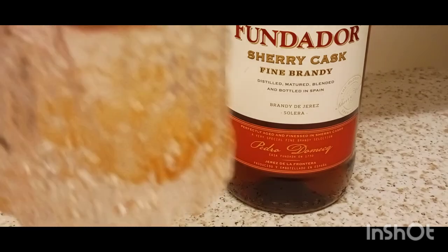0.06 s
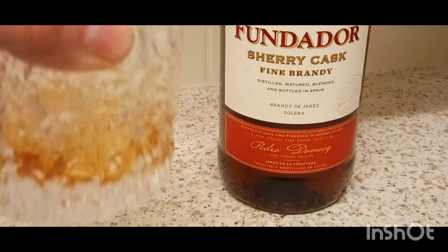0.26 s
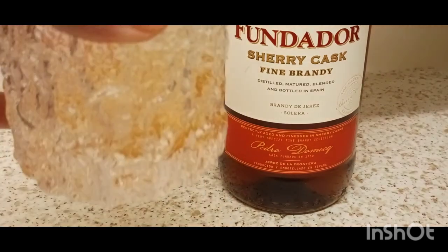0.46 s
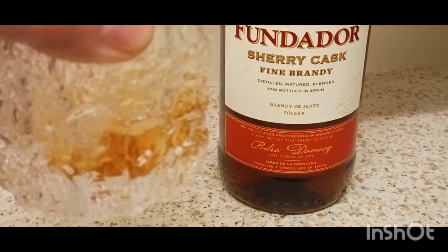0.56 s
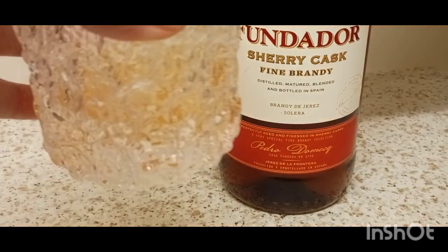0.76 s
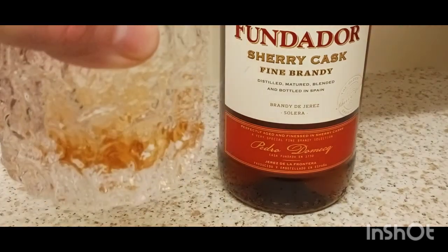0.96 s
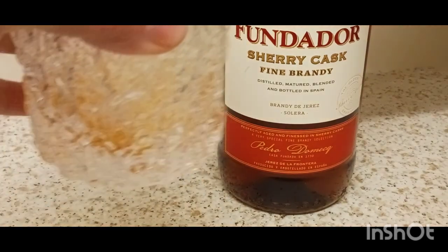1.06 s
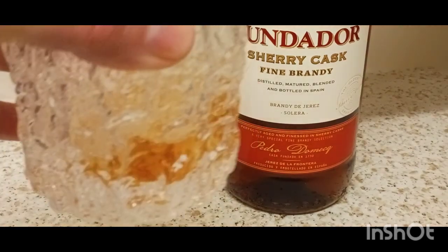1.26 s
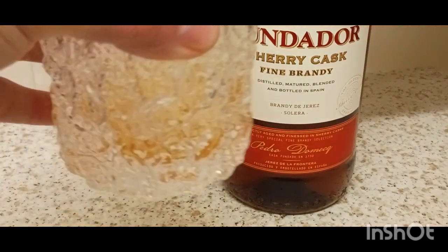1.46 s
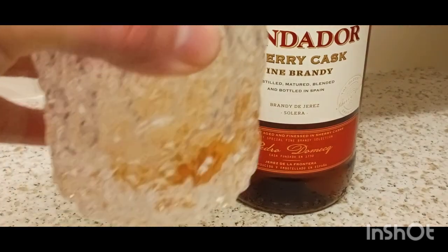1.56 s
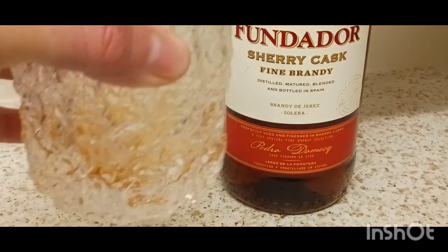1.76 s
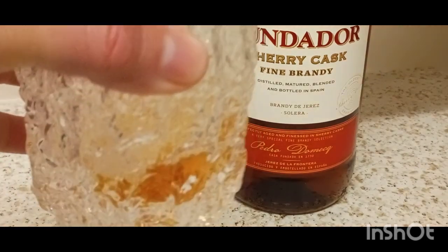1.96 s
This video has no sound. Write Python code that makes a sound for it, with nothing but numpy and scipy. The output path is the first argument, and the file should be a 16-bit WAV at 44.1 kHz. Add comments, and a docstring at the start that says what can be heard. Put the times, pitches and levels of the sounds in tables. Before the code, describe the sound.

Ice cubes clink in a hand-swirled glass tumbler. Nearly quiet until 0.2 s, then crisp knocks crowd together from 0.25 to 0.55 s, with a clear liquid glug near 0.52. Looser rattling runs to 0.9, a brief lull, lighter clinks from 1.0, a strong pair near 1.4, another at 1.7, then faint ticks. Short damped rings, soft slosh, low handling rumble, small hard room, close stereo.

```python
"""Ice cubes knock against the wall of a thick tumbler swirled by hand in a small hard room.
Each knock is a brief noise crunch that rings the damped modes of the glass and the cube's own short clack.
Small random touches rattle between, the drink glugs in swelling sines, a few dull thuds sound low down.
Slosh, room tone and handling rumble are lumpy filtered noise. Two microphone ports, the left a little
nearer, hear the glass direct, in near echoes and in a diffuse tail."""
import sys
import numpy as np
from scipy import signal
from scipy.fft import rfft, irfft, next_fast_len
from scipy.io import wavfile
from scipy.ndimage import uniform_filter1d

SR = 44100
rng = np.random.default_rng(int(sys.argv[2]) if len(sys.argv) > 2 else 0)


def generate_wav(signal):
    """Clip the signal to [-1, 1] and save it as 16-bit WAV at the path in sys.argv[1]."""
    frames = np.transpose(np.atleast_2d(signal))
    scaled = np.clip(frames, -1, 1) * 32767
    pcm = np.round(scaled).astype(np.int16)
    wavfile.write(sys.argv[1], SR, pcm)


def gain_from_decibels(decibels):
    """Convert decibel values to linear amplitude factors."""
    exponent = np.asarray(decibels, float) / 20
    return 10 ** exponent


N = 88200

CLACK_T60_S, LONGEST_RING_S = .009, .11  # the cube's clack; the hand damps the wall
CRACK_DB, CRACK_LOW_HZ = -0.5, 6000


def rms_one(x):
    """Scales a sound to an rms of one."""
    return x / np.sqrt(np.mean(x ** 2) + 1e-20)


def at_hz(points, hz):
    """Reads a (f/Hz, value) table along log frequency."""
    table_hz, values = np.array(points).T
    return np.interp(np.log(hz + 1), np.log(table_hz), values)


def in_time(rows):
    """Draws a (t/s, value) table as a curve over the scene."""
    return np.interp(np.arange(N) / SR, *np.transpose(rows))


def ring(x, hz, t60):
    """A damped resonator: a unit click sets a sine of height about 1 ringing, for 2 ms at least."""
    radius = gain_from_decibels(-60 / (max(t60, .002) * SR))
    turn = 2 * np.pi * hz / SR
    return signal.lfilter([0, np.sin(turn)], [1, -2 * radius * np.cos(turn), radius ** 2], x + 1e-18)


def struck(crunch, hz, t60):
    """A mode rung by a crunch, whose chance strength at that pitch is partly evened out."""
    t = np.arange(len(crunch)) / SR
    share = np.abs(np.sum(crunch * np.exp(2j * np.pi * hz * t)))
    return ring(crunch, hz, t60) / np.sqrt(share ** 2 + .1)


def detuned(hz, t60, chance):
    """Where a contact lands shifts a mode a little; modes ringing over 30 ms keep their pitch better."""
    return hz * (1 + .022 * chance * min(1, .03 / t60))


def crack(x):
    """The bright edge of a contact."""
    high_pass = signal.butter(2, CRACK_LOW_HZ, "high", fs=SR, output="sos")
    return gain_from_decibels(CRACK_DB) * signal.sosfilt(high_pass, x)


# modes of the hand-held glass, also rung by the rattle: (f/Hz, relative level/dB, t60/s before the cap)
GLASS_MODES = [(1178, 2, 0.018), (1633, -14, 0.098), (1830, -4, 0.0073), (2560, -1, 0.14),
               (2738, 3.5, 0.072), (3280, 5, 0.0087), (3700, 8.5, 0.0071), (4310, 7.5, 0.01),
               (5290, -0.5, 0.0034), (5855, -1.5, 0.011), (6375, 5, 0.017), (6805, 7.5, 0.023),
               (9000, -23, 0.013), (11050, -2, 0.0018)]
# knocks of ice on glass: (t/s, relative level/dB, f/Hz of the cube's clack, brightness/dB per octave, unclipped)
ICE_KNOCKS = [(.0074, -25, 2980, -10), (.2062, -26.5, 6440, 5), (0.2248, -13.5, 6600, 0.5),
              (0.2518, -11, 6060, 1.5), (.2554, -15.5, 6000, 13), (0.2862, -12, 3280, 0.5),
              (0.3658, -28, 2420, -6.5), (0.3881, -17.5, 3040, 12), (0.394, -8, 6430, 4.5),
              (0.4043, -12, 6100, 13), (0.4265, -14, 4040, 4), (0.442, -16.5, 5050, 13),
              (.456, -12.5, 5220, 21), (0.4671, -11, 6020, -9), (0.5034, -13, 6370, -4),
              (.5307, -11.5, 6660, -3), (0.5347, -15, 7000, 4), (0.5932, -21.5, 3430, 2),
              (0.623, -24.5, 3000, 13), (0.6313, -22, 1600, -1), (0.6535, -19.5, 2880, -3),
              (.693, -19.5, 4250, -4), (0.7035, -14, 4200, -4.5), (0.7386, -17, 2600, -6),
              (0.7699, -18.5, 3720, 1), (0.7875, -23, 4300, -1), (0.7996, -10, 6300, 2.5),
              (0.8373, -20, 6570, 3), (.8618, -13, 2806, 6), (0.8764, -25.5, 2560, -4),
              (.895, -22.5, 5980, 4), (0.9895, -32.5, 2660, -5), (1.0023, -23.5, 3150, -7),
              (1.008, -20.5, 2870, -5), (1.0201, -15.5, 6110, 1.5), (1.0539, -23.5, 3990, 0),
              (1.0845, -27, 3630, -2), (1.095, -27.5, 3960, 0.5), (1.1121, -27, 4300, 1),
              (1.1512, -14, 6260, 0.5), (1.1731, -27.5, 1550, -2), (1.2012, -18.5, 9770, 1.5),
              (1.2373, -21.5, 5850, -3), (1.252, -18, 6000, 3.5), (1.3371, -26, 6380, -2.5),
              (1.3723, -18.5, 3140, -8.5), (1.389, -15, 6690, -2), (1.3972, -8, 6120, 3),
              (1.42, -11.5, 7000, 7.5), (1.4604, -27.5, 2700, -4), (1.5094, -25, 1550, 7),
              (1.5362, -23, 6280, 6), (1.5442, -22, 6500, 1.5), (1.6133, -25, 3750, -12),
              (1.677, -29.5, 4380, -14), (1.6935, -11, 6460, 7), (1.7071, -19.5, 6350, -1.5),
              (1.7454, -22, 6820, 14), (1.7589, -19.5, 3780, -7), (1.7814, -27.5, 4530, 3),
              (1.8161, -20, 3524, -3), (1.8694, -24, 4370, -3), (1.8814, -25.5, 4300, -4),
              (1.9758, -29, 4260, 15), (1.9914, -25.5, 2640, 6)]


def knocks():
    """A short crunch strikes every glass mode with a strength of its own, and the cube clacks."""
    crunch_s, crunch_rise_s = .001, .0004
    grind_s, grind_db = .01, -21  # a fainter, longer scrape
    dullest, brightest = -3, 13  # dB per octave
    clack_db, mode_chance_db, knock_db = 18.5, 3, -7
    out, t = np.zeros(N), np.arange(SR // 8) / SR
    decay = np.exp(-t / crunch_s) + gain_from_decibels(grind_db) * np.exp(-t / grind_s)
    shape = decay * (1 - np.exp(-t / crunch_rise_s))
    for s, db, clack_hz, tilt in ICE_KNOCKS:
        tilt = np.clip(tilt, dullest, brightest)
        crunch = rng.standard_normal(len(t)) * shape
        crunch = crunch / np.sqrt(np.sum(crunch ** 2))
        hit = gain_from_decibels(clack_db) * struck(crunch, clack_hz, CLACK_T60_S)
        hit += gain_from_decibels(tilt) * crack(crunch)
        for hz, mode_db, t60 in GLASS_MODES:
            strength, tune = rng.standard_normal(2)
            gain_db = mode_db + mode_chance_db * strength + tilt * np.log2(hz / 6000)
            hit += gain_from_decibels(gain_db) * struck(crunch, detuned(hz, t60, tune), min(t60, LONGEST_RING_S))
        first_5_ms = hit[:SR // 200]
        hit = gain_from_decibels(db + knock_db) * hit / np.sqrt(np.mean(first_5_ms ** 2) * 2)
        start = int(s * SR)
        out[start:start + len(hit)] += hit[:N - start]
    return out


# vigour of the small touches between knocks: (t/s, relative level/dB)
TOUCH_VIGOUR = [(0, -42), (.08, -68), (.11, -106), (.2, -55), (.24, -40), (.35, -45.5), (.45, -32),
                (.6, -45.5), (.88, -35.5), (.94, -74), (1.05, -43.5), (1.26, -49.5), (1.32, -56.5),
                (1.42, -37.5), (1.57, -56), (1.72, -47), (1.9, -48.5), (1.95, -69)]


def rattle():
    """Random small touches ring the same glass, detuned by where they land, and clack at scattered pitches."""
    touches_per_s, spread_db, clack_db, rattle_db = 700, 3.5, 16, 3.5
    strength = gain_from_decibels(spread_db * np.minimum(rng.exponential(1, N), 2.5))
    touch = (rng.random(N) < touches_per_s / SR) * strength
    rings = crack(touch)
    dealt = rng.integers(0, 16, size=N)  # which of 16 clack pitches each touch gets
    for k, hz in enumerate(np.geomspace(1300, 7000, num=16)):
        rings += gain_from_decibels(clack_db) * ring(touch * (dealt == k), hz, CLACK_T60_S)
    for group in range(4):  # four landing spots, each with its own detuning
        spot = touch * (dealt // 4 == group)
        for hz, db, t60 in GLASS_MODES:
            taps = spot * rng.standard_normal(N)
            mode_hz = detuned(hz, t60, rng.standard_normal())
            rings += gain_from_decibels(db) * ring(taps, mode_hz, min(t60, LONGEST_RING_S))
    return gain_from_decibels(in_time(TOUCH_VIGOUR) + rattle_db) * rms_one(rings)


# glugs of the drink: (t/s of the swell's top, level/dB there before the ports, f/Hz there, swell width/s)
DRINK_GLUGS = [(0.31, -30.5, 1013, 0.0057), (0.443, -20, 1140, 0.0014), (0.455, -24.5, 772, 0.0021),
               (0.459, -28.5, 1008, 0.01), (0.468, -25.5, 1300, 0.0017), (0.5, -28.5, 810, 0.0031),
               (0.519, -8.5, 1085, 0.0026), (0.533, -16.5, 1760, 0.00054), (0.697, -31, 700, 0.0023),
               (0.744, -16, 1118, 0.0018), (1.149, -29.5, 1050, 0.0015)]


def drink():
    """Each glug is an air pocket: a sine that swells, fades and rises in pitch."""
    rise_per_s = 5  # share of the pitch gained each second
    out = np.zeros(N)
    for s, db, hz, swell in DRINK_GLUGS:
        t = np.arange(N) / SR - s
        envelope = np.exp(-.5 * (t / swell) ** 2)
        cycles = hz * t * (1 + .5 * rise_per_s * t)
        out += gain_from_decibels(db) * envelope * np.sin(2 * np.pi * cycles)
    return out


# colour of the left port against the right, before the overall offset: (f/Hz, level/dB)
PORT_COLOUR = [(300, -8), (1000, 11.5), (3000, 13), (7000, 0.5), (13000, 9.5)]


def ports(x):
    """The glass is nearer the left port: the right hears it later and in another colour."""
    left_lead_s, left_db = 0.0002023, -5.5
    size = next_fast_len(N + 512)
    hz = np.fft.rfftfreq(size, 1 / SR)
    half = gain_from_decibels(.5 * (left_db + at_hz(PORT_COLOUR, hz)))  # half the difference goes to each port
    right = np.exp(-2j * np.pi * hz * left_lead_s) / half
    return irfft(rfft(x, size) * np.array([half, right]), size)[:, :N]


def near_echoes(x):
    """Counter, bottle and hand scatter the sound for a few ms, apart at the ports, anew as the glass moves."""
    echo_db, echo_s, swirl_step_s = 0, .0012, .03
    t, step = np.arange(SR // 100) / SR, int(swirl_step_s * SR)
    out = np.zeros((2, N + SR))
    x = np.r_[np.zeros(step), x, np.zeros(2 * step)]
    fade = np.hanning(2 * step)  # overlapping positions crossfade
    for i in range(0, N + step, step):
        echoes = rng.standard_normal((2, len(t))) * np.exp(-t / echo_s)
        echoes = echoes / np.sqrt(np.sum(echoes ** 2, axis=1, keepdims=True))
        part = signal.fftconvolve(x[None, i:i + 2 * step] * fade, echoes, axes=1)
        out[:, i:i + part.shape[1]] += part
    return gain_from_decibels(echo_db) * out[:, step:step + N]


# decay of the small hard room: (f/Hz, t60/s)
ROOM_DECAY = [(300, 0.59), (1200, 0.26), (3500, 0.26), (8000, 0.25), (15000, 0.15)]


def room(x):
    """Diffuse noise tail, unrelated at the two ports, dying band by band."""
    room_db, gap_s = -1.5, 0.0018
    t, tail = np.arange(SR // 2) / SR, 0
    edges = np.geomspace(150, 18000, 11)
    white = rng.standard_normal((2, len(t)))
    for low, high in zip(edges, edges[1:]):
        band = signal.sosfilt(signal.butter(2, [low, high], "band", fs=SR, output="sos"), white)
        t60 = np.clip(at_hz(ROOM_DECAY, np.sqrt(low * high)), .05, 1)
        tail = tail + band * gain_from_decibels(-60 * t / t60)
    tail = tail * np.clip(t / gap_s - 1, 0, 1)  # silent for one gap, faded in over the next
    tail = tail / np.sqrt(np.sum(tail ** 2) / 2)
    return gain_from_decibels(room_db) * signal.fftconvolve(x[None], tail, axes=1)[:, :N]


# dull thuds: (t/s of the swell's top, level/dB there, f/Hz, rise width/s, fall width/s)
DULL_THUDS = [(0.252, -55.5, 148, 0.002, 0.0035), (0.411, -52.5, 311, 0.0068, 0.021),
              (0.451, -44, 333, 0.009, 0.0089), (0.912, -55, 144, 0.019, 0.025),
              (1.568, -46, 121, 0.0025, 0.0086), (1.832, -40.5, 278, 0.0013, 0.0062),
              (1.86, -35.5, 327, 0.0014, 0.0025)]


def thuds():
    """Soft low sine bumps that swell and fade, alike at both ports."""
    out = np.zeros(N)
    for s, db, hz, rise, fall in DULL_THUDS:
        t = np.arange(N) / SR - s
        envelope = np.exp(-.5 * (t / np.where(t < 0, rise, fall)) ** 2)
        out += gain_from_decibels(db) * envelope * np.sin(2 * np.pi * hz * t)
    return out


def lumpy_noise(spectrum, level, side_db):
    """Coloured noise whose level comes in lumps, part common and part opposed at the two ports."""
    lump_db, lumps_per_s = 3, 14
    hz = np.fft.rfftfreq(N, 1 / SR)
    colour = gain_from_decibels(at_hz(spectrum, hz)) * (hz > 10)
    mid, side = irfft(rfft(rng.standard_normal((2, N))) * colour, N)
    slow = (hz > 1) / (1 + (hz / lumps_per_s) ** 2)
    lumps = rms_one(irfft(rfft(rng.standard_normal(N)) * slow, N))
    noise = rms_one(mid + gain_from_decibels(side_db) * side * [[1], [-1]])
    return gain_from_decibels(in_time(level) + lump_db * lumps) * noise


# colour of the low slosh and room tone: (f/Hz, relative level/dB per Hz)
SLOSH_COLOUR = [(100, -24.5), (200, -15), (330, 1), (520, -6), (1000, -29), (4000, -19.5), (16000, -25)]
# its course before the lumps: (t/s, level/dB)
SLOSH_LEVEL = [(0, -68.5), (.2, -68), (.42, -56.5), (.85, -60.5), (.95, -77), (1.1, -62.5), (1.33, -71.5),
               (1.5, -65.5), (1.7, -58.5), (2, -58.5)]


def slosh_and_room_tone():
    """Low noise, mostly common to both ports."""
    return lumpy_noise(SLOSH_COLOUR, SLOSH_LEVEL, side_db=-9)


# colour of the handling rumble: (f/Hz, relative level/dB per Hz)
RUMBLE_COLOUR = [(25, -9), (60, -9.5), (150, -5.5), (250, -6), (500, -49)]
# its course before the lumps: (t/s, level/dB)
RUMBLE_COURSE = [(0, -71), (.15, -94), (.25, -79.5), (.9, -73), (2, -73)]


def handling_rumble():
    """Deep noise with nearly as much opposed as common sound at the two ports."""
    return lumpy_noise(RUMBLE_COLOUR, RUMBLE_COURSE, side_db=-0.5)


def scene():
    """Ice and glugs, direct and reflected, over thuds and low noise."""
    glass_low_hz, glug_wet_db = 933, -3
    no_bass = signal.butter(6, glass_low_hz, "high", fs=SR, output="sos")  # the small glass radiates no bass
    ice = signal.sosfilt(no_bass, knocks() + rattle())
    glugs = drink()
    direct = ports(ice + glugs)
    reflected = near_echoes(ice) + room(ice + gain_from_decibels(glug_wet_db) * glugs)
    return direct + reflected + thuds() + slosh_and_room_tone() + handling_rumble()


def roll_off(x):
    """The treble ends steeply here."""
    return signal.sosfilt(signal.butter(12, 16810, fs=SR, output="sos"), x)


def record(dry):
    """The recorder ends the treble and turns quiet sound above its low edge further down."""
    top_hz, low_edge_hz = 16400, 220
    threshold_db, ratio, window_s = -55, .8, .015  # ratio: dB of cut per dB below the threshold
    dry = signal.sosfilt(signal.cheby2(10, 50, top_hz, fs=SR, output="sos"), dry)
    low = signal.sosfiltfilt(signal.butter(2, low_edge_hz, fs=SR, output="sos"), dry)
    high = dry - low
    power = uniform_filter1d(np.mean(high ** 2, axis=0), int(window_s * SR))
    level_db = 10 * np.log10(power + 1e-12)
    cut_db = ratio * np.minimum(level_db - threshold_db, 0)
    return roll_off(low + high * gain_from_decibels(cut_db))


dry = scene()
out = record(dry)
generate_wav(out)
```